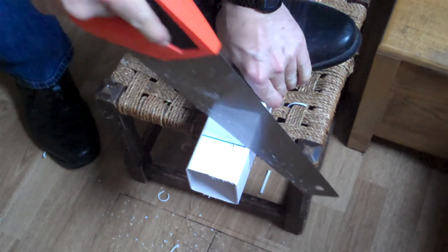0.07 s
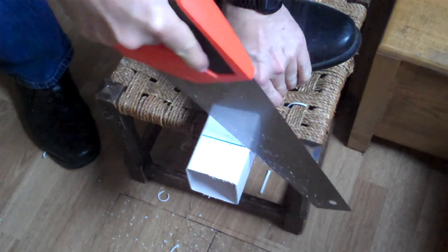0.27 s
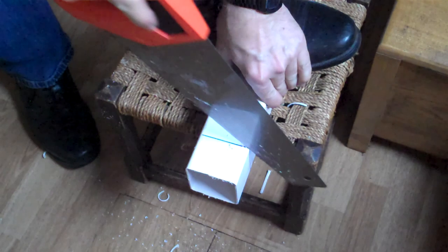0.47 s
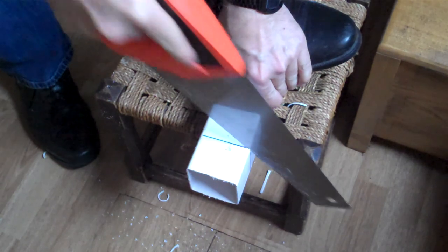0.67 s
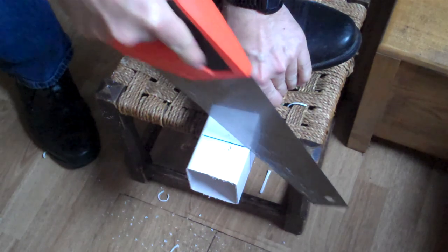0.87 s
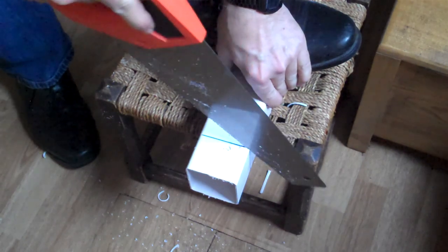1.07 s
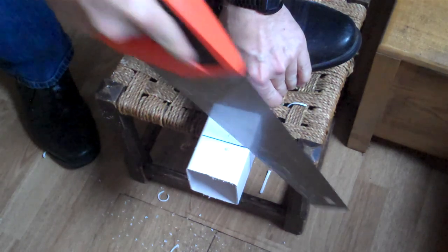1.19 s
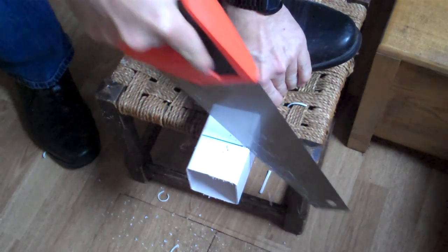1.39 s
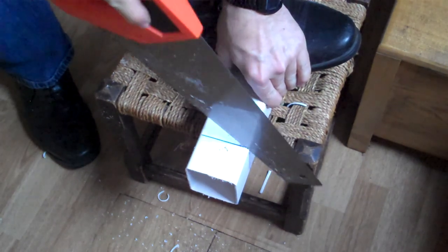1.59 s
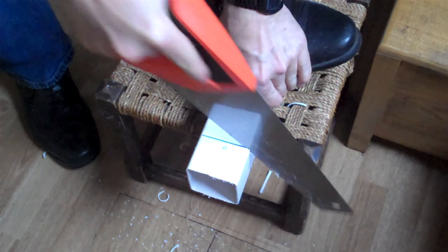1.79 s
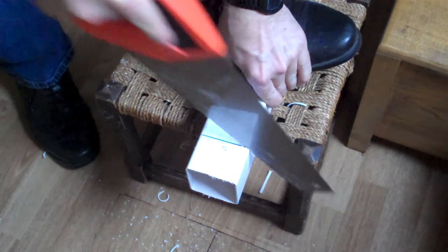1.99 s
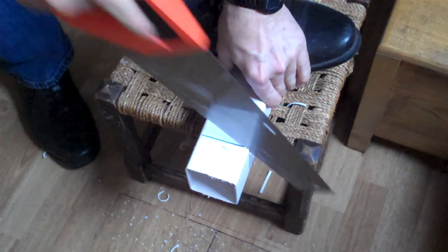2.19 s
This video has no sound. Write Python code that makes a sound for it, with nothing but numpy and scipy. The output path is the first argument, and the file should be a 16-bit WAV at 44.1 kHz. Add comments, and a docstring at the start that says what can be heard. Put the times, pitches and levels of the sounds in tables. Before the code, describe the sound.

Close handsaw rasping through hollow plastic pipe, loud pushes alternating with softer return strokes.

```python
"""A rhythmic rasp over a hollow boom: a handsaw cuts a square plastic pipe, close by in a small room.
Each stroke speeds up and slows down. The teeth form a train of impacts, chipping the wall hard on the
push and skidding on the return; caught teeth break free with a crack. The impacts excite the damped
modes of the pipe and the stool it is held down on, which boom, and of the steel blade, which rings."""
import sys
import numpy as np
from scipy import signal
from scipy.fft import rfft, irfft
from scipy.io import wavfile
from scipy.ndimage import uniform_filter1d, map_coordinates

SR = 44100
rng = np.random.default_rng(int(sys.argv[2]) if len(sys.argv) > 2 else 0)


def unload_wav(signal):
    """Save mono or channel-first audio to the path in sys.argv[1] as 16-bit WAV at rate SR, clipped to [-1, 1]."""
    wavfile.write(
        sys.argv[1],
        SR,
        np.round(np.clip(np.atleast_2d(signal).T, -1, 1) * 32767).astype(np.int16),
    )


N = 99225
T = np.arange(N) / SR


def amp(db):
    """Decibels to amplitude ratio."""
    return 10 ** (np.asarray(db) / 20)


def unit(response):
    """Normalisation to unit energy."""
    return response / np.sqrt(np.sum(response ** 2))


def through(x, response):
    """Convolution with an impulse response."""
    return signal.oaconvolve(np.atleast_2d(x), response[None], axes=1)[:, :N]


def colour(spectrum, size=2048):
    """Minimum-phase response of a (frequency_hz, level_db) curve, by folding the cepstrum."""
    hz, db = np.array(spectrum, float).T
    bins_hz = np.maximum(np.fft.rfftfreq(size, 1 / SR), 1)
    cepstrum = irfft(np.log(amp(np.interp(np.log(bins_hz), np.log(hz), db))))
    cepstrum[1:size // 2] *= 2
    cepstrum[size // 2 + 1:] = 0
    return irfft(np.exp(rfft(cepstrum)))


def ring(modes, rise_s):
    """Modal superposition: damped cosines add up under a brief swell."""
    t = T[:SR // 4]
    free = sum(amp(db) / t60 * np.exp(-np.log(1000) * t / t60) * np.cos(2 * np.pi * hz * t)
               for hz, t60, db in modes)
    return unit(free * (1 - np.exp(-t / rise_s)))


def relax(x, decay_s):
    """Exponential relaxation: each impulse spreads into a tail of the same area."""
    return signal.lfilter([1], [1, -np.exp(-1 / (decay_s * SR))], x) / (decay_s * SR)


def walk(rate_hz):
    """Slow random fluctuation with a spread near 1."""
    return np.interp(T * rate_hz, np.arange(N), rng.standard_normal(N))


# spectrum of the quiet room: frequency_hz, level_db
HUSH_SPECTRUM = [(30, -2), (65, 1.5), (140, -8.5), (260, -6.5), (1000, -24), (4000, -28), (10000, -33.5),
                 (14000, -46)]


def hush(level_db=-59.5):
    """Stationary noise: a faint, low background."""
    return amp(level_db) * through(rng.standard_normal((2, N)), unit(colour(HUSH_SPECTRUM)))


# stereo width: frequency_hz, side_gain_db
SIDE_SPECTRUM = [(60, -14), (180, -33), (350, -20), (700, -13.5), (1400, -11.5), (2800, -8), (5600, -3),
                 (11000, -1)]
# stereo balance: frequency_hz, left_minus_right_db
BALANCE = [(350, 0), (700, 1.7), (2800, 1.4), (5600, .6), (9500, -1.6), (13000, 1.7)]


def room(mid_side, t60_s=0.22, side_lag_s=0.00099):
    """Diffuse reflection adds a short tail; the treble sounds wide and the boom central."""
    t = T[:SR // 4]
    tails = rng.standard_normal((2, len(t))) * np.exp(-np.log(1000) * t / t60_s)
    reflected = amp(-9) * through(mid_side, colour([(250, -8), (1000, 7), (4000, -0.5), (12000, -10)]))
    mid, side = (mid_side[k] + through(reflected[k], unit(tails[k]))[0] for k in (0, 1))
    side = through(np.interp(T - side_lag_s, T, side), colour(SIDE_SPECTRUM))  # a longer path
    return np.vstack([through(mid + sign * side, colour([(hz, sign * db / 2) for hz, db in BALANCE]))
                      for sign in (1, -1)])


# rumble of the stool: frequency_hz, level_db
STOOL_SPECTRUM = [(20, -19), (55, 1), (88, -8), (108, 0), (135, -17), (300, -5.5), (2000, -43.5)]


def stool_rumble(speed, lag_s=0.0072):
    """Friction noise: the drag of the saw shakes the stool in proportion to its speed."""
    drag = relax(speed, lag_s) * rng.standard_normal(N)
    return through(drag, unit(colour(STOOL_SPECTRUM)))


def singing_blade(start_s=1.418, pitch_hz=3150, t60_s=0.17, rise_s=0.0059, level_db=-42):
    """Free vibration: as the third push eases off, the flexing blade rings on, faint and unsteady."""
    age = np.maximum(T - start_s, 0)
    envelope = (1 - np.exp(-age / rise_s)) * np.exp(-np.log(1000) * age / t60_s)
    return amp(level_db) * envelope * walk(rate_hz=226) * np.sin(2 * np.pi * pitch_hz * age)


# modes of the pipe on its stool: pitch_hz, t60_s, level_db
PIPE_MODES = [(107.7, 0.3, -15), (175, 0.057, -10), (232.2, 0.21, 3), (246.5, 0.098, 4), (283.9, 0.078, 3),
              (312.5, 0.07, 5.5), (342.6, 0.15, 1.5), (443, 0.14, -14.5), (520, 0.14, -6),
              (643.5, .09, -13), (682.8, 0.073, -4), (788, 0.1, -7), (863.6, 0.18, -12.5), (982, 0.14, -12),
              (1058, 0.18, -15), (1214, 0.094, -18)]


def pipe(force, cutoff_hz=168):
    """Resonance of pipe and stool; a body small against the wavelength radiates little deep bass."""
    radiation = signal.butter(2, cutoff_hz, "high", fs=SR, output="sos")
    return through(force, unit(signal.sosfilt(radiation, ring(PIPE_MODES, rise_s=0.0059))))


# modes of the steel blade: pitch_hz, t60_s, level_db
BLADE_MODES = [(1735, 0.05, -2), (1854, 0.02, 4), (2530, 0.096, -14), (3468, 0.12, 1.5), (3886, 0.03, 0),
               (4540, 0.049, -12), (5960, 0.039, -1.5), (9140, 0.06, -4)]


def blade(excitation, spectrum, ring_db=-12.5):
    """Source and filter: contact noise gives the bright cut and a short ring of the steel."""
    bright = through(excitation, unit(colour(spectrum)))
    return bright + amp(ring_db) * through(excitation, ring(BLADE_MODES, rise_s=0.00023))


def grit(spikiness):
    """Fracture noise: plastic breaks up in spikes of log-normal size; rows are mid and side."""
    noise = rng.standard_normal((2, N)) * np.exp(spikiness * rng.standard_normal(N))
    return noise / noise.std()


def moving_contact(x, rate_hz=55.94, depth_db=4, band_octaves=0.2094):
    """Spectral modulation: narrow bands swell and fade as the contact moves along the blade."""
    hz, t, bands = signal.stft(x, SR, nperseg=256)
    grid = np.meshgrid(np.log2(1 + hz / 500) / band_octaves, t * rate_hz, indexing="ij")
    swell = amp(depth_db * map_coordinates(rng.standard_normal((64, 256)), grid, order=1, mode="wrap"))
    return signal.istft(bands * swell / np.sqrt(np.mean(swell ** 2)), SR)[1][:, :N]


# teeth snapping free: start_s, snap_db, tilt_db_per_octave, knock_db
TOOTH_CATCHES = [(.017, -6, 2.5, -25), (0.154, -11, -5, -7.5), (.166, -9.5, -2.5, -0.5),
                 (0.225, -3.5, -4.5, -13), (0.265, -6.5, -7, -15), (0.294, 3.5, -1.5, -10),
                 (0.306, 7, -2, -3), (.324, 0.5, -8, 10), (.462, -10.5, -7.5, -5), (0.488, -7.5, -0.5, -8),
                 (.524, 0.5, -2.5, 3.5), (.563, -4, -7, 5.5), (.587, -13.5, -2, 0),
                 (.608, -12.5, -2.5, -12), (0.622, -17, 1.5, -33), (0.711, -4, 1, -12),
                 (0.73, -1.5, 1.5, 5), (.739, -9, 3, 12.5), (.763, 1, 2, 6), (.787, 7, -2, 12),
                 (0.794, -1, -6, 13.5), (.824, 4, -5.5, 14), (.848, 0, -4, 10.5), (0.872, -3.5, -7, 4),
                 (1.009, -9.5, -1, -8), (1.097, -0.5, -1.5, 2), (1.129, -5, -6.5, -32),
                 (1.149, -12.5, 2, -2.5), (1.176, -16, -5, -10), (1.224, -8.5, -3.5, -9),
                 (1.253, -8, -3, 6.5), (1.267, 4, -5, -1), (1.278, 2.5, 6, 12.5), (1.296, 0.5, 6, 7),
                 (1.315, -5, 0, 5), (1.342, -1, -4.5, 10), (1.357, 6.5, -3.5, 11), (1.372, 8, -1, 11.5),
                 (1.39, 2, -3.5, 3.5), (1.403, 2, -5, 7), (1.52, -6.5, -5, -7.5), (1.603, -8.5, 2, -6),
                 (1.657, -21, 3, 2.5), (1.68, -9, -4, -7), (1.737, -38, 0, -4.5), (1.759, -15.5, -2.5, -5),
                 (1.808, -6, -3, -4), (1.829, 1.5, -3, 5.5), (1.86, 3.5, -1.5, -3), (1.883, 6, -1.5, 12.5),
                 (1.897, 1.5, -1, -2), (1.91, -2, -7.5, -1), (1.928, -3, -10.5, 7), (1.944, 1.5, -3, -20),
                 (2.054, -10.5, -5.5, -8.5), (2.081, -15, -4, -4), (2.131, -13, 0, -1),
                 (2.175, -11, 4, -20)]
# spectrum of a snap: frequency_hz, level_db
SNAP_SPECTRUM = [(150, -33.5), (400, -13.5), (900, -3), (1400, -8), (2600, -5), (4400, -.5), (7500, -8.5),
                 (10000, -10), (12500, -21), (14500, -27)]


def catches(rise_s=0.001, decay_s=0.0071):
    """Impulsive excitation: a caught tooth breaks free with a crack and knocks the pipe."""
    snaps, knocks = np.zeros((2, N)), np.zeros(N)
    noise = moving_contact(grit(spikiness=0.39))
    age = T[:SR // 20]
    envelope = (1 - np.exp(-age / rise_s)) * np.exp(-age / decay_s)
    for start_s, snap_db, tilt, knock_db in TOOTH_CATCHES:
        onset = int(start_s * SR)
        span = slice(onset, onset + len(age))
        slope = colour([(hz, snap_db + tilt * np.log2(hz / 3000)) for hz in (500, 9000)])
        snaps[:, span] += through(noise[:, span] * envelope, slope)[:, :len(age)]
        knocks[onset] += amp(knock_db)
    return amp(-36) * blade(snaps, SNAP_SPECTRUM) + amp(-13.5) * pipe(relax(knocks, decay_s=0.0003))


def teeth(speed, scatter_db, tooth_hz=403, jitter=0.25, grab_hz=65, grab_db=7):
    """Stick-slip modulates an uneven impulse train, one impulse a tooth; rates are for full speed."""
    teeth_passed = np.cumsum(speed) * tooth_hz / SR
    late, size = rng.standard_normal((N // 20, 2)).T
    onsets = np.searchsorted(teeth_passed, np.arange(len(late)) + 1 + jitter * late)
    hits = np.bincount(onsets, amp(scatter_db * np.tanh(size)), N + 1)[:N]
    # the blade grabs, eases off over a few teeth and grabs again
    grab_phase = np.cumsum(speed * np.exp(walk(grab_hz) / 2)) * grab_hz / SR % 1
    hits *= amp(-grab_db * grab_phase)
    # the teeth in contact share the force of the arm
    return hits / np.sqrt(np.abs(uniform_filter1d(hits ** 2, size=2600)) + 0.0017)


def strokes(rows, spectrum, rasp_db, boom_db, stool_db, rasp_power, boom_power, scatter_db):
    """Forced vibration: teeth drive blade and pipe, each by a power law of the blade's speed."""
    speed, rasp, boom = np.zeros((3, N))
    for start_s, fastest_s, end_s, bite_db, shake_db in rows:
        stroke_speed = np.sin(np.pi / 2 * np.interp(T, [start_s, fastest_s, end_s], [0, 1, 0]))
        speed += stroke_speed
        rasp += amp(bite_db) * stroke_speed ** rasp_power
        boom += amp(shake_db) * stroke_speed ** boom_power
    hits = teeth(speed, scatter_db)
    chips = np.sqrt(relax(hits ** 2, decay_s=0.0032)) * grit(spikiness=0.33)  # crumbling after each hit
    force = hits * np.sign(rng.standard_normal(N)) * boom
    rumble = stool_rumble(speed)
    cut = blade(moving_contact(chips) * rasp, spectrum)
    return amp(rasp_db) * cut + amp(boom_db) * pipe(force) + amp(stool_db) * rumble


# return strokes: start_s, fastest_s, end_s, rasp_db, boom_db
RETURN_STROKES = [(-.12, .0, 0.084, -1, 1), (.385, .53, 0.65, -1.5, 5.5), (.93, 1.06, 1.183, -1, 1),
                  (1.495, 1.63, 1.72, 3.5, 6.5), (2.02, 2.16, 2.27, .5, 2.5)]
# spectrum of skidding teeth: frequency_hz, level_db
SKID_SPECTRUM = [(150, -28), (400, -2), (850, 7.5), (1400, -1.5), (2800, -1.5), (4200, -4.5), (7500, -10),
                 (9500, -11), (11000, -15.5), (14500, -25)]


def returns():
    """Sliding friction: the teeth skid back with a softer, duller rasp."""
    return strokes(RETURN_STROKES, SKID_SPECTRUM, rasp_db=-51, boom_db=-53, stool_db=-61,
                   rasp_power=1.45, boom_power=1.2, scatter_db=3)


# push strokes: start_s, fastest_s, end_s, rasp_db, boom_db
PUSH_STROKES = [(.15, .31, 0.39, -6.5, -6.5), (.66, .785, 0.92, -1, -2), (1.21, 1.34, 1.46, -0.5, 0),
                (1.79, 1.89, 1.995, -1.5, -1)]
# spectrum of cutting teeth: frequency_hz, level_db
CUT_SPECTRUM = [(150, -15), (400, -11.5), (800, -6), (2000, 2.5), (2800, 3), (4200, 2.5), (5500, -2),
                (7500, -6.5), (10500, -10.5), (12500, -17), (14500, -35)]


def pushes():
    """Chip formation: the teeth break into the wall with a loud, bright rasp."""
    return strokes(PUSH_STROKES, CUT_SPECTRUM, rasp_db=-35.5, boom_db=-30.7, stool_db=-48,
                   rasp_power=1.86, boom_power=1.42, scatter_db=2.5)


def scene():
    """Superposition: the sounds of the saw and the background add up in one room."""
    return room(pushes() + returns() + hush() + catches() + singing_blade())


def record(dry, low_hz=74, top_hz=14100):
    """Band limiting: filters remove the deepest bass and the highest treble."""
    thin = signal.sosfilt(signal.butter(3, low_hz, "high", fs=SR, output="sos"), dry)
    return signal.sosfilt(signal.ellip(8, .2, 70, top_hz, fs=SR, output="sos"), thin)


dry = scene()
out = record(dry)
unload_wav(out)
```